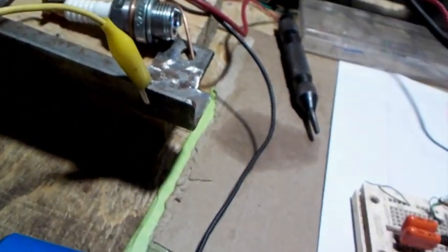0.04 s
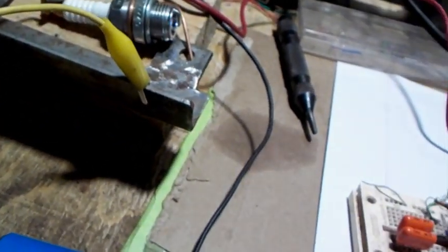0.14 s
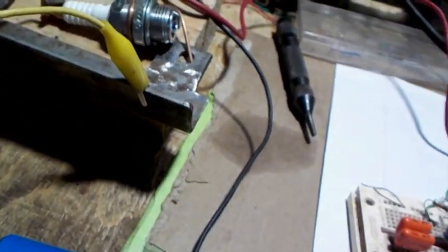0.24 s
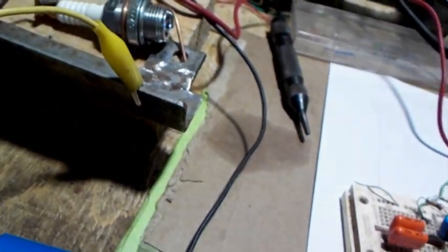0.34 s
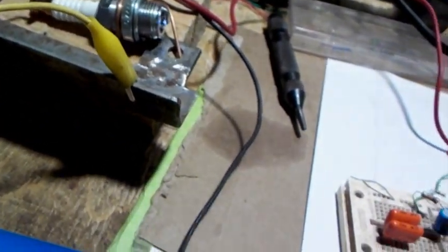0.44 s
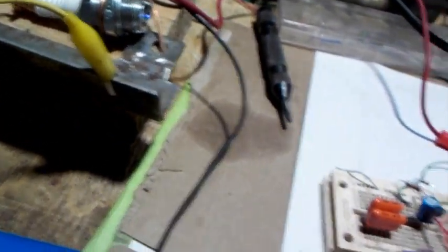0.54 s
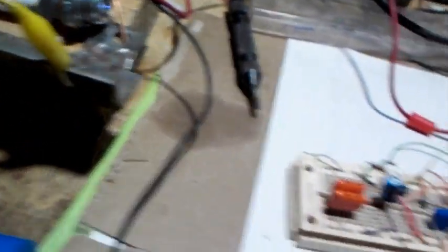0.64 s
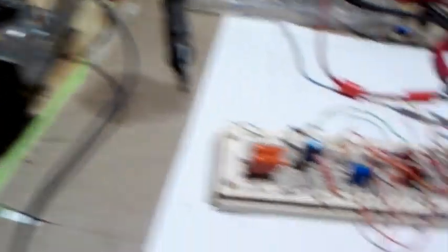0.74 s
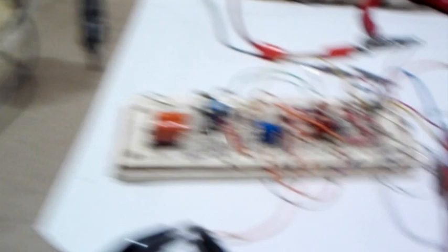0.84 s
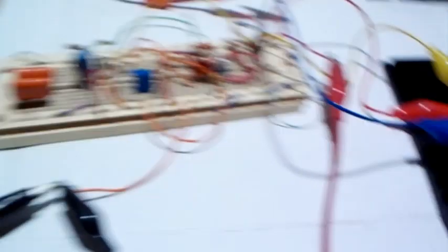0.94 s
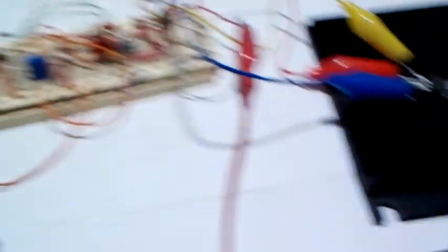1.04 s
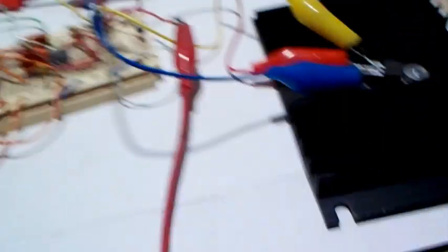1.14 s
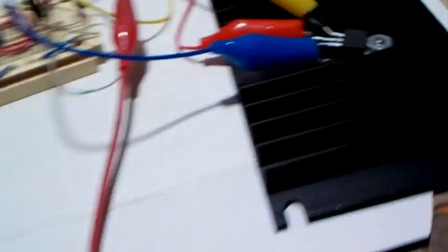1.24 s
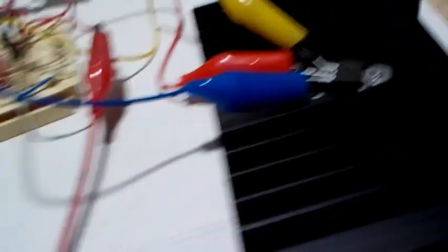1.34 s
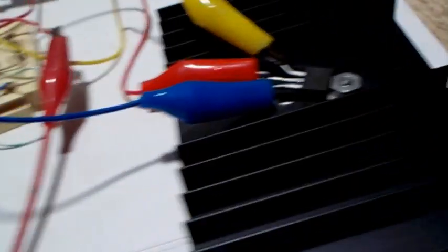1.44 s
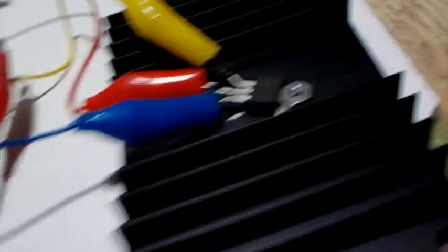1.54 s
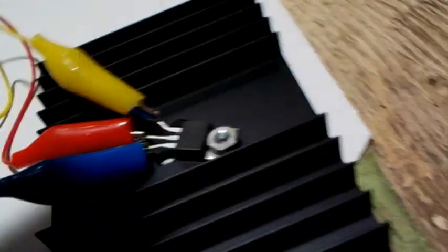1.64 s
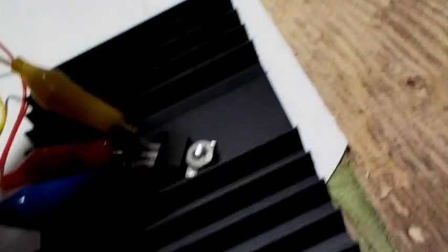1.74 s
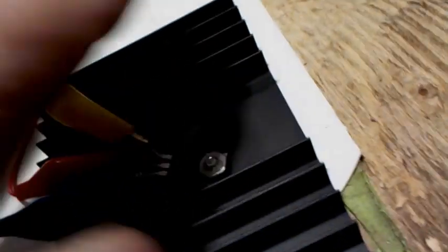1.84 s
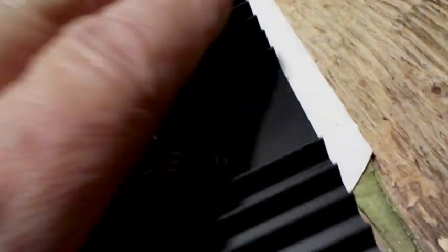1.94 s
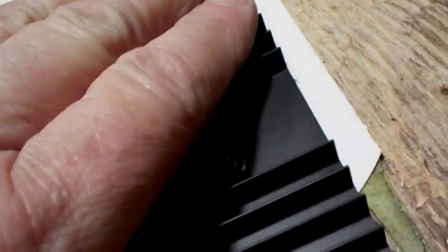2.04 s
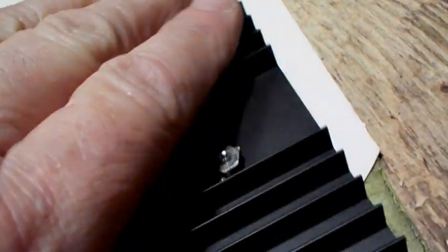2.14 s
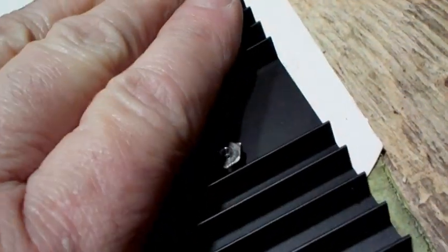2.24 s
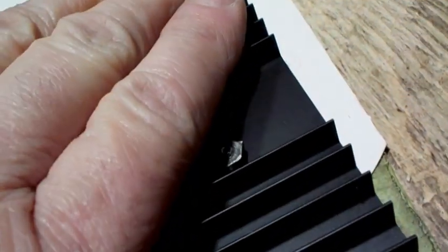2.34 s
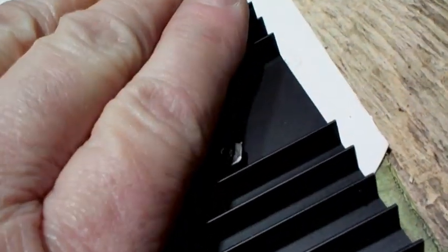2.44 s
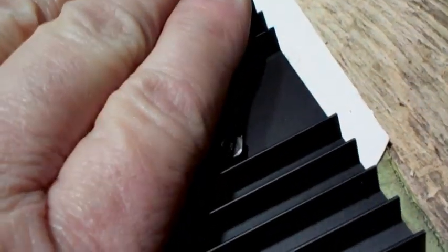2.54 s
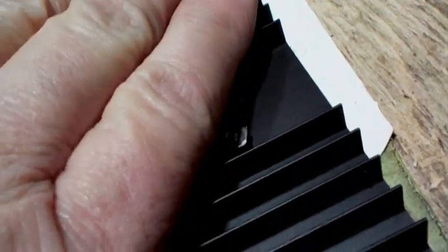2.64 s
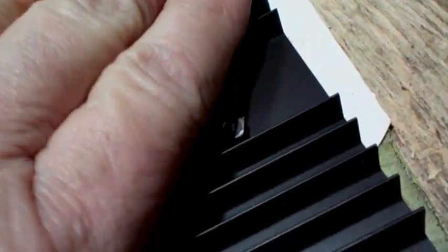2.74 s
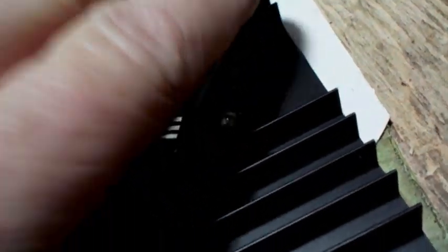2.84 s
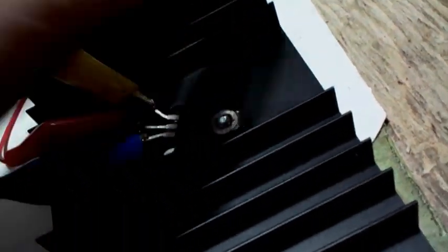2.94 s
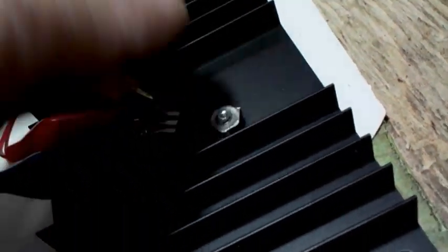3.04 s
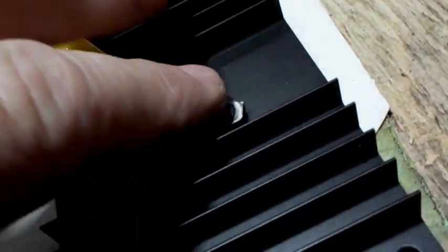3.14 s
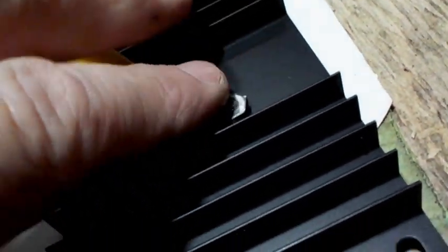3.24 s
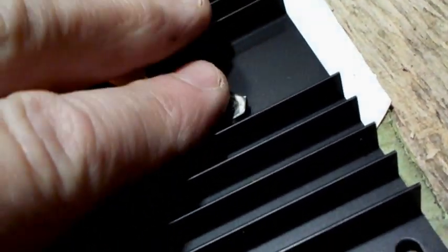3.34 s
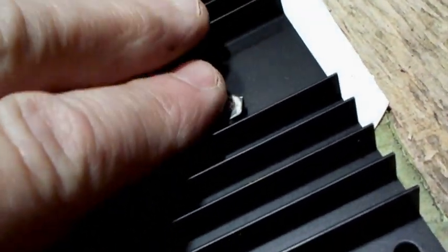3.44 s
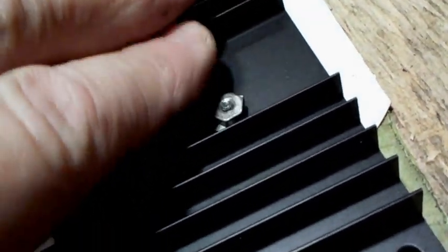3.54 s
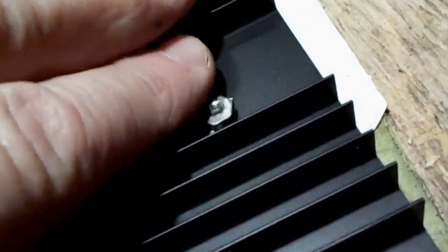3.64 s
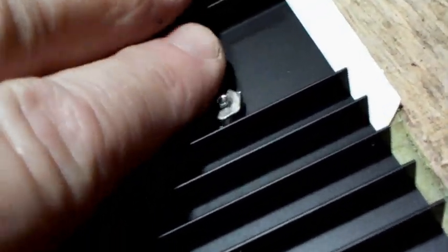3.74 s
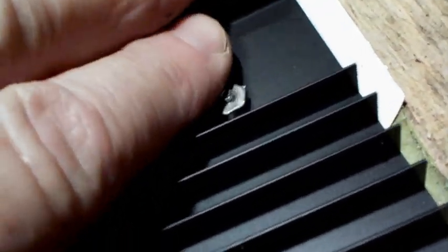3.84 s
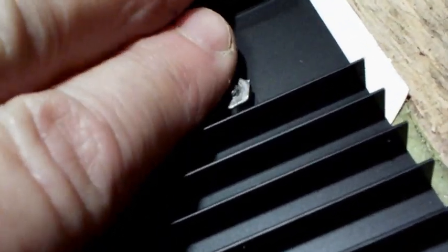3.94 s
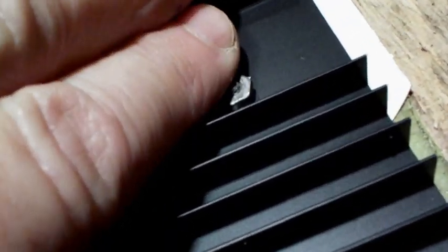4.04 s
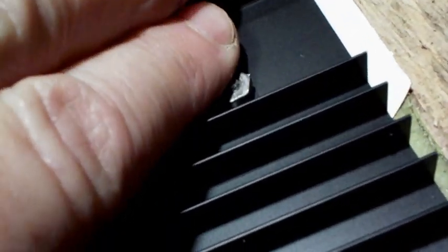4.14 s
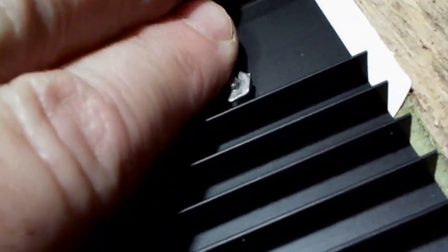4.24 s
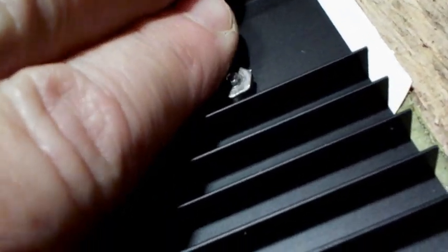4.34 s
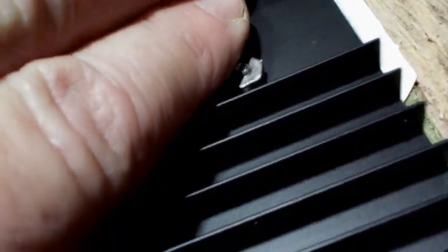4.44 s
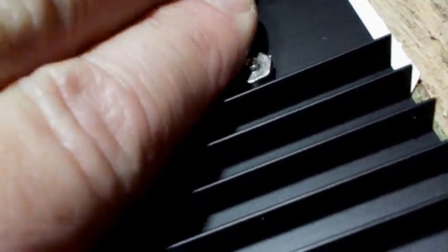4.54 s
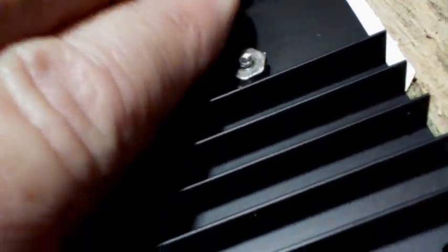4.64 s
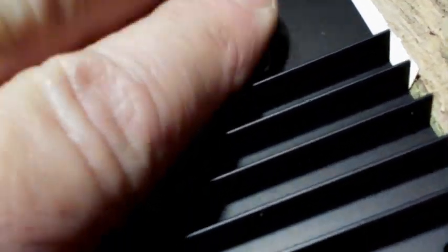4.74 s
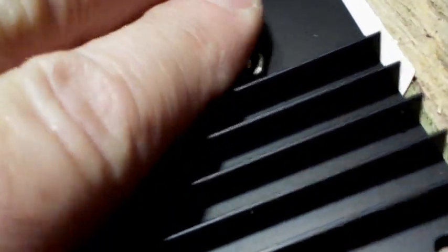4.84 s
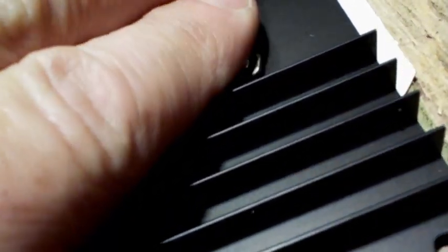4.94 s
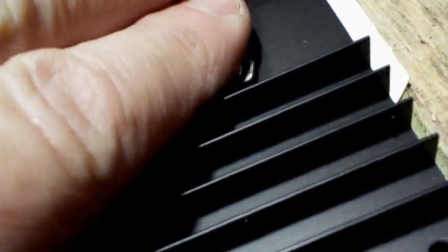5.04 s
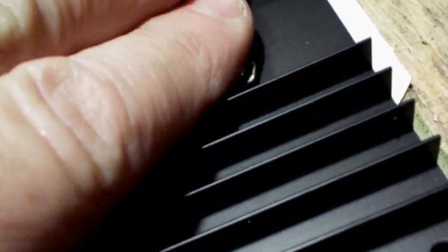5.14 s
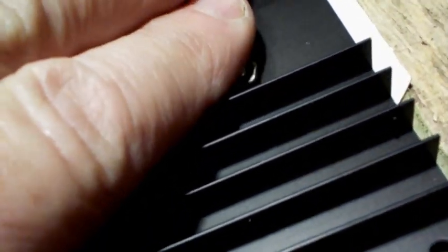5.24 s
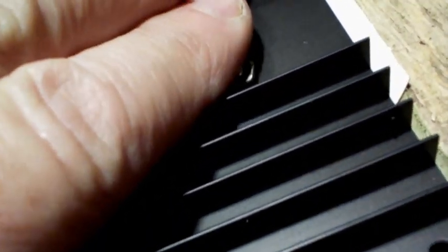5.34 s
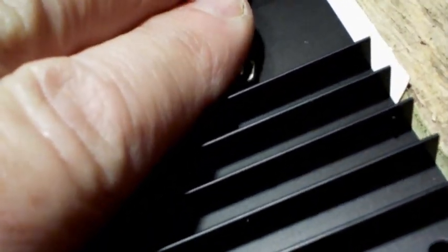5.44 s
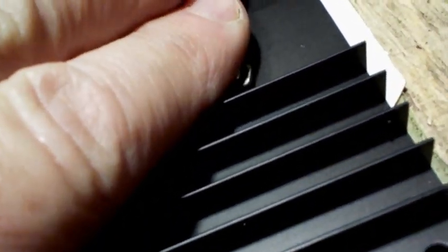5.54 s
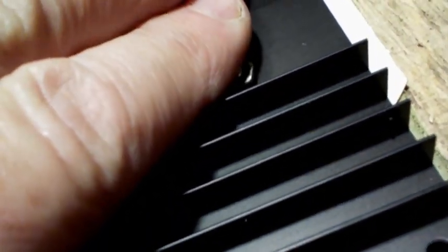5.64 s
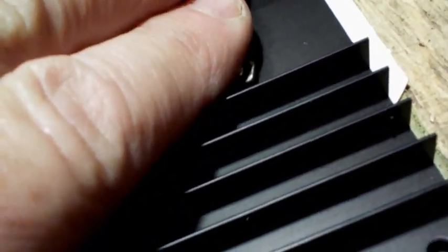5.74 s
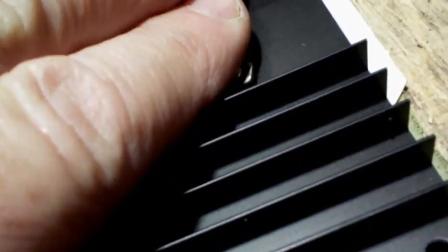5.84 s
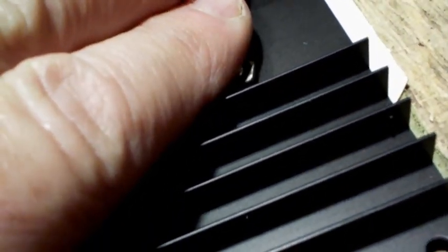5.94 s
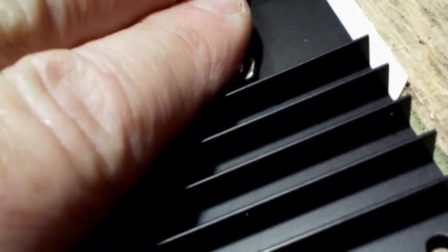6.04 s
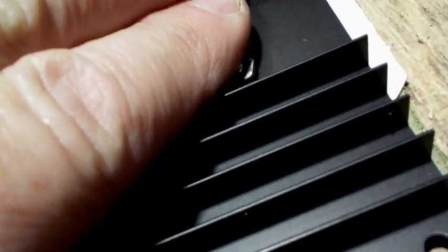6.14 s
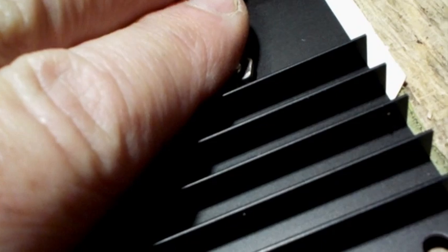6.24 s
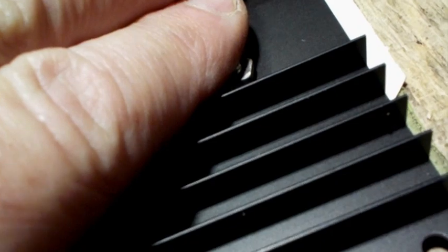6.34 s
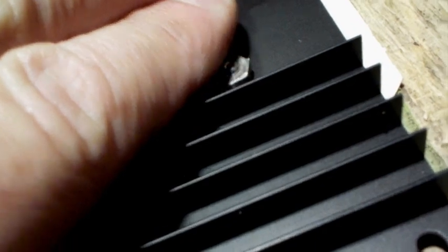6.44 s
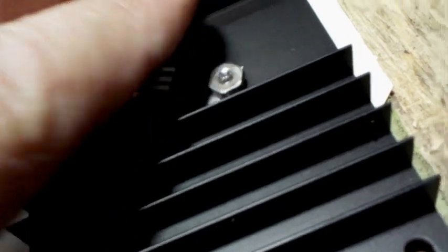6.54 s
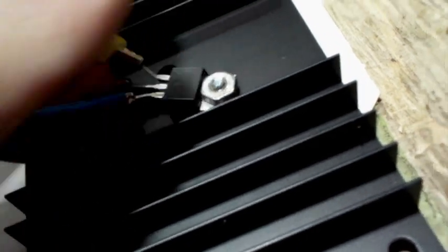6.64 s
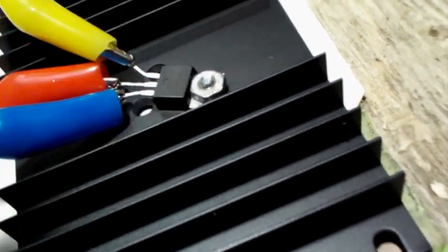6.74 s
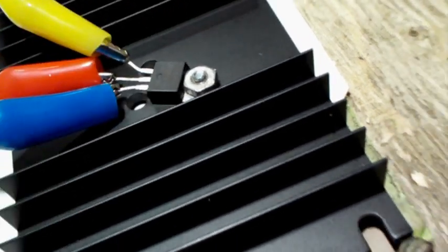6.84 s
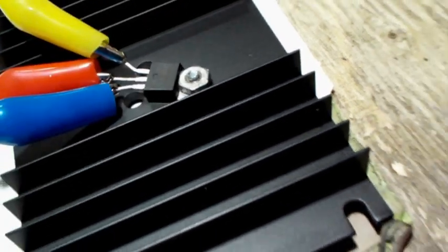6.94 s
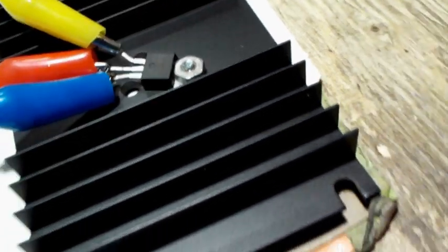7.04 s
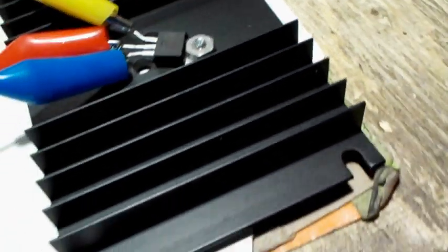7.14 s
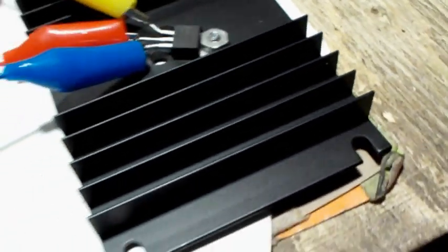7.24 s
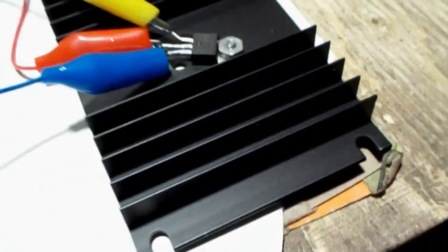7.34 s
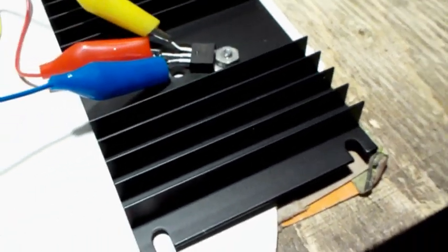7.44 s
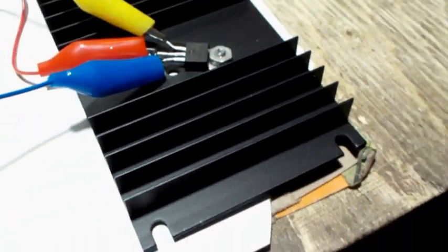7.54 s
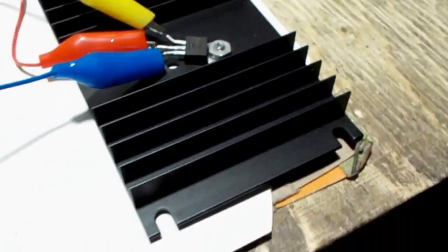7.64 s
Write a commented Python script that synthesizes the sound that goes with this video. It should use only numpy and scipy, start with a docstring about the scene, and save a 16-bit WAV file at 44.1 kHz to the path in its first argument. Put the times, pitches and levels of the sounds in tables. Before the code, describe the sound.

A spark plug fed by an ignition coil fires continuously on a workbench, giving a high-pitched, buzzing hiss with a thin, slightly wavering whine. It is close and loudest for the first second and a half, with tiny sputters and dropouts. At about 1.2 seconds a very brief, higher whistle rises out of it. Between 1.3 and 1.7 seconds the handheld microphone picks up a few light knocks, clicks and finger rubs, the clearest near the start of that cluster. By 1.8 seconds the hiss has become noticeably softer and shifted in colour as the microphone moves along the bench. It then holds steady, flickering a little, while the whine fades in and out. Around 7.4 seconds the high whistle briefly returns, and the hiss continues to the end at about 7.7 seconds. Faint room noise and a low electric hum lie underneath.

```python
"""A spark plug on a workbench, fed by an ignition coil switched about 3200 times a second.
The gap fires unevenly and rings plug and bench in a hiss; the flexing coil core adds a whine.
The colour shifts as a handheld camera moves from plug to circuit board to heat sink and draws back,
with a few handling knocks on the way. A quiet rush and an electric hum fill the workshop."""
import sys
import numpy as np
from scipy import signal
from scipy.fft import rfft, irfft, next_fast_len
from scipy.io import wavfile
from scipy.ndimage import uniform_filter1d, map_coordinates

SR = 44100
rng = np.random.default_rng(int(sys.argv[2]) if len(sys.argv) > 2 else 0)


def to_wav(s):
    """Save 16-bit WAV."""
    ch = np.atleast_2d(s).T  # columns
    pcm = np.round(np.clip(ch, -1, 1) * 32767)  # PCM
    wavfile.write(sys.argv[1], SR, pcm.astype(np.int16))


N = 340003
TIME_S = np.arange(N) / SR
FFT_SIZE = next_fast_len(N + SR // 2, True)
FREQ_HZ = np.fft.rfftfreq(FFT_SIZE, 1 / SR)

# coil driver, slowing under spark load: time_s, rate_hz
DRIVER_RATE = [(0.0, 3228), (0.3, 3172), (0.78, 3210), (0.86, 3170), (1.11, 3232), (1.25, 3167),
               (1.5, 3198), (2.0, 3170), (2.2, 3186), (2.5, 3168), (2.72, 3163), (2.82, 3214), (3.08, 3174),
               (3.4, 3201), (3.72, 3166), (3.95, 3150), (4.33, 3130), (4.5, 3158), (5.05, 3162),
               (5.12, 3183), (5.18, 3143), (5.72, 3140), (5.82, 3175), (6.0, 3159), (6.25, 3245),
               (6.36, 3133), (6.63, 3182), (6.93, 3147), (7.02, 3210), (7.15, 3180), (7.4, 3173),
               (7.52, 3206), (7.7, 3195)]
# coil voltage over the gap's need, positive steady, negative ragged: time_s, margin
FIRING_MARGIN = [(0, 0.064), (1.62, 0.42), (1.8, -0.32), (3.4, -0.24), (4.0, -0.43), (6.2, -0.44),
                 (7.08, -0.064), (7.22, -0.49), (7.4, 0.49), (7.62, -0.34)]
# spark at the camera: time_s, level_db
SPARK_LEVEL = [(0.0, -33), (1.0, -33.5), (1.66, -36), (1.76, -42.5), (1.98, -43.5), (2.42, -42),
               (3.46, -42.5), (3.74, -42), (6.46, -42.5), (6.76, -44), (6.88, -43), (7.08, -41.5),
               (7.2, -41.5), (7.62, -42.5), (7.7, -43.5)]
# gap falters or flares: centre_s, length_s, gain_db
SPUTTERS = [(0.152, 0.01, -8), (0.192, 0.0069, 4), (0.446, 0.009, 1.5), (0.478, 0.017, -10),
            (0.526, 0.012, -7.5), (0.594, 0.0055, -9), (0.612, 0.027, 3.5), (0.878, 0.01, -13.5),
            (0.971, 0.011, 6), (0.988, 0.0062, -6), (1.203, 0.07, 0.5), (1.363, 0.011, -5),
            (1.858, 0.019, 4.5), (2.177, 0.0098, -5), (2.317, 0.012, 5), (2.476, 0.008, 4.5),
            (3.713, 0.0046, -4), (3.778, 0.0082, 4), (4.324, 0.006, 3), (4.414, 0.0069, 2.5),
            (5.038, 0.0063, 6.5), (5.701, 0.0066, 6), (6.08, 0.0042, 3), (7.561, 0.0072, -12)]
# camera moves from each place to the next: start_s, end_s
CAMERA_MOVES = [(.72, 1.25), (1.62, 1.874), (3.65, 3.9), (6.78, 7.45)]
# plug, board, heat sink, hand resting, drawn back: bounce_delay_ms, bounce_gain, pan_db
CAMERA_PLACES = [(0.5, 0, 1.8), (0.425, 0.1, 0.3), (0.59, 0.08, -0.8), (0.58, 0.04, -2.2),
                 (0.69, 0.16, -3.2)]
# plug and bench resonances: pitch_hz, width_hz, plug_db, board_db, sink_db, hand_db, back_db
BENCH_MODES = [(568, 290, -13, -11, -15, -15.5, -7), (1025, 330, -10.5, -7, -15, -24, -16),
               (1872, 84, -25, -26, -2, 1.5, -26), (1969, 29.6, -12, 2, -6, 1.5, -16),
               (2030, 350, -3, -4.5, -22, -48, 1), (2970, 1390, -5, -15, -9.5, -7.5, -7.5),
               (3920, 204, 2, -2.5, -13.5, -25, -18), (4090, 230, -22, -17, -12.5, -3, -14),
               (4570, 400, -20, 3, -5.5, -8.5, -5), (4691, 83, 10, 8, 2.5, 6.5, 1),
               (4806, 59, -9, -2, -3, 9, -1), (4890, 240, 2, 2, 1.5, -12, 1),
               (5176, 120, 8.5, 0, -0.5, 1, 3), (5407, 145, 12, 7.5, 3, 7.5, 11),
               (5580, 130, -10, 0, -1, 0, 8), (6034, 205, 5, 3, -3.5, -4, 0.5),
               (6186, 131.5, -8, 4, -7, -1.5, 2), (6277, 100, 0, 2, -9, -2, 1.5),
               (6482, 237, -2.5, -3, -0.5, -1.5, 1), (6950, 760, -3.5, -8, -9, -6, -3),
               (9255, 460, -14.5, -17.5, -17.5, -21, -16), (12150, 3150, -19, -18, -20.5, -18.5, -16.5)]
# left port over right, at plug and board: freq_hz, pan_db
PLUG_PAN = [(1000, -2), (3000, 0), (5600, 1.5), (6300, 4.5), (7200, 6), (8400, 9), (9600, 3.5), (12000, 4)]
# left port's phase lead there: freq_hz, lead_rad
PLUG_LEAD = [(300, 0.14), (4500, 0.42), (5900, -0.5), (7000, -0.5), (9400, 0.5), (12000, 1.7)]
# left port over right, from the heat sink on: freq_hz, pan_db
SINK_PAN = [(60, 0.0), (97, -2.5), (160, -13), (250, -3), (410, -2), (660, 2), (1070, -6), (1730, -1.5),
            (2800, 5), (4530, -4.5), (7320, 6.5), (11800, -1.5)]
# left port's phase lead there: freq_hz, lead_rad
SINK_LEAD = [(300, 0.051), (4400, 0.11), (5200, 0.3), (5800, 6.8), (6500, 3.09), (8400, 3.2), (9800, 0.46),
             (11000, 3.5)]
# colour of the scatter off tools and walls: freq_hz, gain_db
SCATTER_SPECTRUM = [(500, 6.5), (2000, 2.5), (4700, 0), (6300, -3), (7500, 2), (12000, -2.5)]
# plug's ringing band as hand and camera shift: time_s, gain_db
RINGING_GAIN = [(0, 1.5), (1.7, -3), (2.2, 0), (2.9, 0.5), (3.1, -3), (3.3, -4), (3.55, -1.5), (3.8, 0.5),
                (3.92, -1.5), (4.05, 2.5), (4.25, 0), (6.05, 0), (6.27, -2), (6.37, 1.5), (6.55, -1.5),
                (6.77, -2), (7.08, -3), (7.2, 3), (7.38, -1.5), (7.58, 5.5), (7.7, 0.5)]
# coil whine at the camera: time_s, level_db
WHINE_LEVEL = [(0, -50.5), (1.27, -51.5), (1.4, -60), (1.62, -53.5), (2.05, -62), (2.55, -64.5),
               (3.75, -67), (4.4, -55), (4.88, -54), (5.11, -71), (5.18, -52.5), (5.7, -55), (5.82, -55),
               (6.28, -69), (6.36, -47), (6.48, -67), (6.9, -53.5), (7.08, -59.5), (7.5, -53), (7.7, -61)]
# workshop rush: freq_hz, relative_db
RUSH_SPECTRUM = [(25, -21), (90, -47), (170, -21), (280, -11.5), (400, -3), (700, -1), (1200, 7.5),
                 (2000, -1), (3500, 0.5), (7000, -40), (12000, -53)]
# electric hum: pitch_hz, level_db
HUM_LINES = [(240, -77.5), (360, -75), (400, -73), (480, -99), (560, -72), (720, -73.5), (840, -78.5)]
# coil whistles an octave above its whine: centre_s, length_s, level_db
OCTAVE_WHISTLES = [(1.22, 0.08, -40), (7.38, 0.18, -44)]
# handling knocks: start_s, thud_gain_db, click_gain_db, scuff_t60_s
GRIP_KNOCKS = [(1.2798, -49, -25.5, 0.0039), (1.2825, -41, -37, 0.0043), (1.3285, -38, -52, 0.0048),
               (1.3352, -26.5, -36, 0.004), (1.353, -42, -56, 0.019), (1.504, -56, -44, 0.02),
               (1.606, -41.5, -41, 0.02), (1.629, -44, -47, 0.028), (1.655, -41, -44, 0.029)]
# dull part of a knock: freq_hz, relative_db
THUD_SPECTRUM = [(30, -19), (120, -22), (200, -13), (330, 0), (600, 2), (1000, -1), (1500, -8), (2200, -12),
                 (5000, -52)]
# sharp part of a knock: freq_hz, relative_db
CLICK_SPECTRUM = [(300, -54), (1700, -7), (2900, -17), (3750, -4), (4200, -8), (5200, -1), (6500, -15),
                  (8500, -12), (11500, -6.5)]
# fingers sliding on the camera: centre_s, length_s, level_db
FINGER_RUBS = [(1.343, 0.22, -52), (1.498, 0.054, -52), (1.632, 0.16, -54)]
# camera case resonances: pitch_hz, width_hz, relative_db
CASE_MODES = [(526.5, 240, -28), (1076, 16, -9), (1314, 47, -6)]
# camera notches near 2400 and 8000 Hz, shallow bench antiresonance near 3000 Hz:
# centre_hz, width_hz, depth_db
NARROW_DIPS = [(2404.5, 279, -50), (3000, 216, -9), (7980, 620, -45)]


def amp(db):
    """Decibels to amplitude."""
    return 10 ** (np.asarray(db) / 20)


def unit_rms(x):
    """Scale to an RMS of 1."""
    return x / np.sqrt(np.mean(x ** 2) + 1e-20)


def over_freq(points):
    """(freq_hz, value) points at every bin, on a log axis."""
    freq_hz, values = np.transpose(points)
    return np.interp(np.log(FREQ_HZ + 1), np.log(freq_hz + 1), values)


def over_time(points):
    """(time_s, value) points at every sample."""
    return np.interp(TIME_S, *np.transpose(points))


def wobble(rate_hz):
    """Smooth random curve, rate_hz knots a second."""
    return map_coordinates(rng.standard_normal(int(N * rate_hz / SR) + 4), [TIME_S * rate_hz])


def swells(rows):
    """Bell-shaped gains from (centre_s, length_s, level_db) rows."""
    return sum(amp(db) * np.exp(-(2 * (TIME_S - centre_s) / length_s) ** 2)
               for centre_s, length_s, db in rows)


def filtered(x, response):
    """Apply a frequency response."""
    return irfft(rfft(x, FFT_SIZE) * response, FFT_SIZE)[..., :N]


def minimum_phase(gain):
    """Response with this gain that rings only after it is struck."""
    cepstrum = irfft(np.log(np.maximum(gain, 1e-6)), FFT_SIZE)
    cepstrum[1:FFT_SIZE // 2] *= 2
    cepstrum[FFT_SIZE // 2 + 1:] = 0
    return np.exp(rfft(cepstrum))


def resonances(modes):
    """Gain of (pitch_hz, width_hz, level_db) peaks, summed in power."""
    return np.sqrt(sum((amp(db) / (1 + ((FREQ_HZ - pitch_hz) / (.75 * width_hz)) ** 2)) ** 2
                       for pitch_hz, width_hz, db in modes))


def impulses(at_samples, sizes):
    """Windowed-sinc pulses at fractional sample positions."""
    index = np.floor(at_samples).astype(int)[:, None] + np.arange(-7, 9)
    offset = index - at_samples[:, None]
    shape = np.sinc(offset) * np.cos(np.pi * offset / 16) ** 2
    return np.bincount(np.clip(index, 0, N).ravel(), (sizes[:, None] * shape).ravel(), N + 1)[:N]


def place_shares():
    """Share of each place heard; every move fades one into the next."""
    progress = [np.clip((TIME_S - start_s) / (end_s - start_s), 0, 1) for start_s, end_s in CAMERA_MOVES]
    return -np.diff([np.ones(N), *progress, np.zeros(N)], axis=0)


def viewpoint():
    """Bounce delay_ms, bounce gain and pan_db along the camera's path."""
    return np.transpose(CAMERA_PLACES) @ place_shares()


def coil_driver(break_sigma=1.15, drift=0.00363, break_speedup=.011):
    """Cycle count and arc hold (0-1); the driver speeds up when the arc briefly breaks."""
    holding = .5 + .5 * np.tanh(4 * (break_sigma - wobble(rate_hz=90)))
    speed = 1 + drift * wobble(rate_hz=110) + break_speedup * (1 - holding)
    return np.cumsum(over_time(DRIVER_RATE) * speed) / SR, holding


def firing_margin(idle_hz=3200, full_load_sag_hz=50):
    """The coil's spare voltage shrinks under load and wanders by chance."""
    load = (idle_hz - over_time(DRIVER_RATE)) / full_load_sag_hz
    return np.clip(over_time(FIRING_MARGIN) - 0.65 * load + 0.63 * wobble(rate_hz=60), -.7, 1.5)


def discharges(cycles, period_jitter=0.0341, drain=0.3, firmness=1.25, spread_db=1.76):
    """One chance of a spark per driver cycle; returns the pulses and their timing in cycles."""
    cycle_starts = np.searchsorted(cycles, np.arange(1, int(cycles[-1])))
    luck, stretch, strength = rng.standard_normal((N // 10, 3))[:len(cycle_starts)].T
    margin = firing_margin()[cycle_starts]
    # periods scatter less in steady firing
    spark_cycles = np.cumsum(1 + period_jitter * np.exp(-0.3 * margin) * stretch)
    at_samples = np.interp(spark_cycles, cycles, np.arange(N))
    # a spark drains the coil: the next cycle is likelier to miss
    luck = signal.lfilter([1], [1, drain], luck)
    firing = 1 + np.tanh(firmness * (margin + luck))
    sizes = firing * amp(spread_db * strength) * (spark_cycles < cycles[-1])
    # steady supply power: rarer sparks are stronger
    power = np.abs(uniform_filter1d(sizes ** 2, size=30))
    return impulses(at_samples, sizes / np.sqrt(power + 0.25)), spark_cycles


def bench_bounce(x, passing_gain=.55):
    """A second path off the bench top; it strengthens and sweeps the colour as the camera travels."""
    delay_ms, gain, _ = viewpoint()
    travelling = 1 - np.sum(place_shares() ** 2, axis=0)
    delayed = map_coordinates(x, [np.arange(N) - delay_ms * SR / 1000])
    return x + (gain + passing_gain * travelling) * delayed


def reflections(x, t60_s, wet_db):
    """Tools, bench and walls scatter the sound; the two microphone ports agree only at low pitch."""
    t = TIME_S[:SR // 3]
    tails = rng.standard_normal((3, len(t))) * amp(-60 * t / t60_s) * (t > .002)
    shared, *own = rfft(tails / np.linalg.norm(tails, axis=1, keepdims=True), FFT_SIZE)
    apart = over_freq([(1500, 0.019), (4500, 0.85), (7500, 1.0)])
    scatter = np.sqrt(1 - apart) * shared + np.sqrt(apart) * np.array(own)
    return x + filtered(x, amp(wet_db + over_freq(SCATTER_SPECTRUM)) * scatter)


def bench_ring(pulses, cutoff_hz=380, dip_hz=3400, dip_width_hz=400, dip_db=-10):
    """Pulses ring plug and bench in each place's colour, at a levelled RMS."""
    pitch_hz, width_hz, *places_db = np.transpose(BENCH_MODES)
    # a small source radiates little bass; the bench radiates poorly between two modes
    radiation = 1 / np.sqrt(1 + (cutoff_hz / (FREQ_HZ + 1)) ** 8)
    radiation *= amp(dip_db * np.exp(-((FREQ_HZ - dip_hz) / dip_width_hz) ** 2))
    ports = [(PLUG_PAN, PLUG_LEAD)] * 2 + [(SINK_PAN, SINK_LEAD)] * 3
    heard = np.zeros((2, N))
    for share, mode_db, (pan, lead) in zip(place_shares(), places_db, ports):
        ring = minimum_phase(radiation * resonances(zip(pitch_hz, width_hz, mode_db)))
        left = amp(over_freq(pan) / 2) * np.exp(.5j * over_freq(lead))
        pair = np.array([left, 1 / left])
        direct = filtered(pulses, ring * pair / np.linalg.norm(pair, axis=0))
        heard += np.sqrt(np.clip(share, 0, 1)) * unit_rms(reflections(direct, t60_s=0.11, wet_db=-1))
    slow_rms = np.sqrt(np.abs(uniform_filter1d(heard.mean(0) ** 2, size=6000)) + 1e-9)
    return heard / slow_rms


def ringing_shift(x, centre_hz=4530, half_width_hz=530):
    """The plug's ringing swells and sinks as hand and camera shift."""
    band = filtered(x, 1 / (1 + ((FREQ_HZ - centre_hz) / half_width_hz) ** 8))
    return x + band * (amp(over_time(RINGING_GAIN)) - 1)


def spark(pulses, sputter_db, trim_db=-1.32, flutter_db=.6):
    """Flickering hiss of the discharges, heard through plug and bench."""
    flicker_db = 0.78 * wobble(rate_hz=45) + 0.59 * wobble(rate_hz=220)
    hiss = ringing_shift(bench_ring(bench_bounce(pulses * amp(flicker_db))))
    return hiss * amp(over_time(SPARK_LEVEL) + trim_db + sputter_db + flutter_db * wobble(rate_hz=10))


def core_phase(cycles, spark_cycles, jitter_share=.36):
    """The heavy core flexes once a cycle and follows part of the sparks' timing scatter."""
    scattered = np.interp(cycles, spark_cycles, np.arange(len(spark_cycles)))
    return 2 * np.pi * (cycles + jitter_share * (scattered - cycles))


def coil_whine(phase_rad, holding, sputter_db, flutter_db=.9, pan_db=4):
    """The core's tone while the arc holds; it sinks when the gap falters but never flares."""
    tone = holding * unit_rms(np.sin(phase_rad))
    level_db = over_time(WHINE_LEVEL) + flutter_db * wobble(rate_hz=22) + np.minimum(sputter_db, 0)
    return tone * amp(level_db) * amp([[pan_db / 2], [-pan_db / 2]])


def ignition():
    """One driver sets the spark's hiss, the coil's whine and its brief octave whistles."""
    cycles, holding = coil_driver()
    pulses, spark_cycles = discharges(cycles)
    phase_rad = core_phase(cycles, spark_cycles)
    sputter_db = sum(db * np.exp(-np.abs(2 * (TIME_S - centre_s) / length_s) ** 3)
                     for centre_s, length_s, db in SPUTTERS)
    hiss = spark(pulses, sputter_db)
    whine = coil_whine(phase_rad, holding, sputter_db)
    whistles = unit_rms(np.sin(2 * phase_rad)) * swells(OCTAVE_WHISTLES)
    _, _, pan_db = viewpoint()
    return (hiss + whine + whistles) * amp([pan_db / 2, -pan_db / 2])


def workshop_rush(level_db=-55.5, side_db=-12, flutter_db=1.6):
    """Quiet room noise, nearly alike at both ports."""
    mid, side = unit_rms(filtered(rng.standard_normal((2, N)), amp(over_freq(RUSH_SPECTRUM))))
    side *= amp(side_db)
    return np.array([mid + side, mid - side]) * amp(level_db + flutter_db * wobble(rate_hz=6))


def electric_hum(flicker_db=1.2, waver_rad=0.41, at_plug_db=-10):
    """Slightly wavering hum lines, weaker beside the plug."""
    hum = np.zeros(N)
    for pitch_hz, level_db in HUM_LINES:
        gain = amp(level_db + flicker_db * wobble(rate_hz=5))
        hum += gain * np.sin(2 * np.pi * pitch_hz * TIME_S + waver_rad * wobble(rate_hz=5))
    return hum * amp(at_plug_db * place_shares()[0])


def contact(t60_s, push_db):
    """One sharp push, then a short scuff."""
    t = TIME_S[:SR // 10]
    scuff = amp(-60 * t / t60_s) * rng.standard_normal(len(t)) * (t > 0)
    return amp(push_db) * (t == 0) + scuff


def handling():
    """The grip shifts on the camera: dull knocks with a click, and rubs that ring its case."""
    thuds, clicks = np.zeros((2, N))
    for start_s, thud_db, click_db, scuff_t60_s in GRIP_KNOCKS:
        start = round(start_s * SR)
        span = slice(start, start + SR // 10)
        thuds[span] += amp(thud_db) * contact(scuff_t60_s, push_db=15)
        clicks[span] += amp(click_db) * contact(t60_s=0.004, push_db=10)
    thuds = filtered(thuds, minimum_phase(unit_rms(amp(over_freq(THUD_SPECTRUM)))))
    clicks = filtered(clicks, minimum_phase(unit_rms(amp(over_freq(CLICK_SPECTRUM)))))
    case_ring = unit_rms(filtered(rng.standard_normal(N), resonances(CASE_MODES)))
    rubs = case_ring * swells(FINGER_RUBS) * amp(wobble(rate_hz=120))
    return reflections(np.array([thuds + clicks + rubs] * 2), t60_s=.08, wet_db=-16)


def scene():
    """Ignition, handling and workshop, in stereo."""
    return ignition() + handling() + workshop_rush() + electric_hum()


def record(dry):
    """Narrow dips from two camera notches and a bench antiresonance; the camera cuts the top treble."""
    top_hz = 12100
    dips = [1 - (1 - amp(depth_db)) / (1 + (2 * (FREQ_HZ - centre_hz) / width_hz) ** 4)
            for centre_hz, width_hz, depth_db in NARROW_DIPS]
    return filtered(dry, np.prod(dips, axis=0) * (FREQ_HZ < top_hz))


dry = scene()
out = record(dry)
to_wav(out)
```